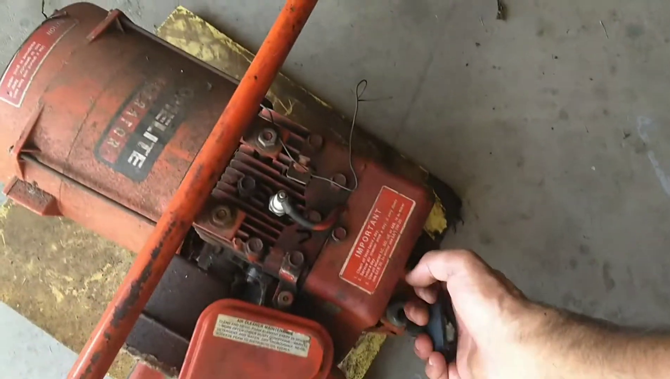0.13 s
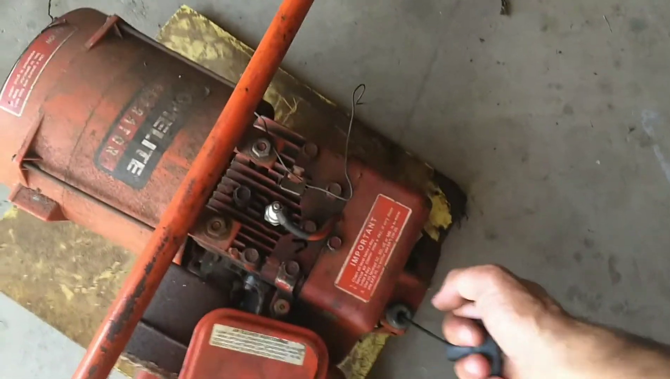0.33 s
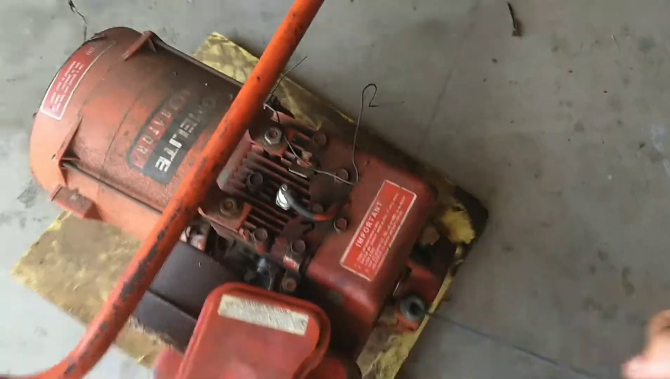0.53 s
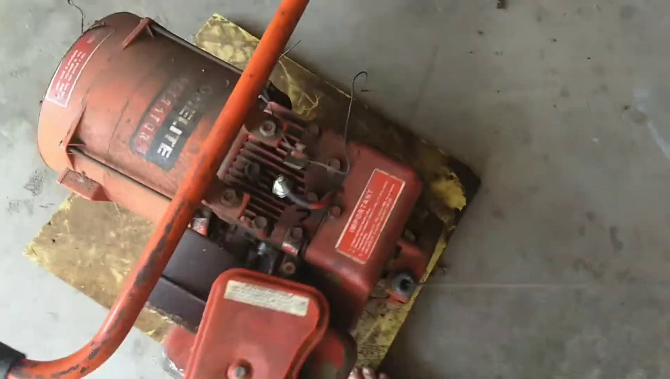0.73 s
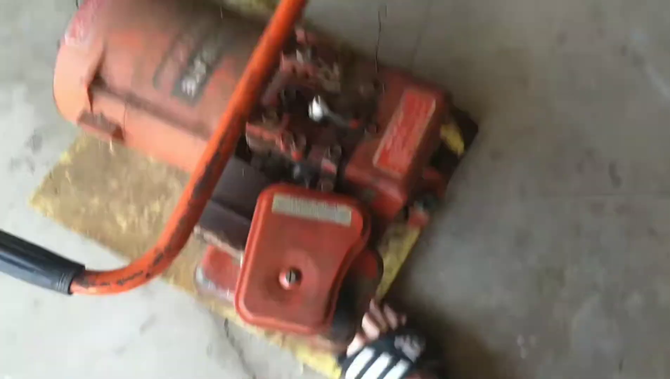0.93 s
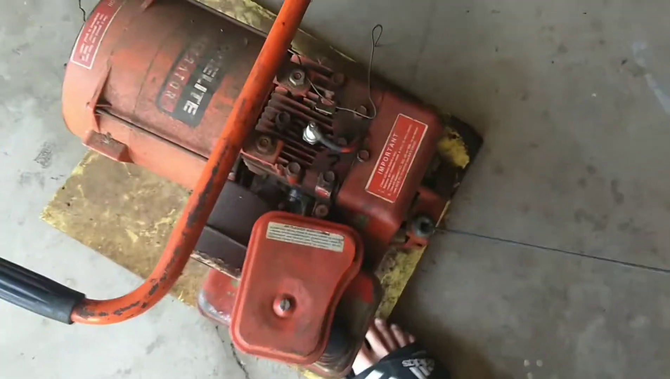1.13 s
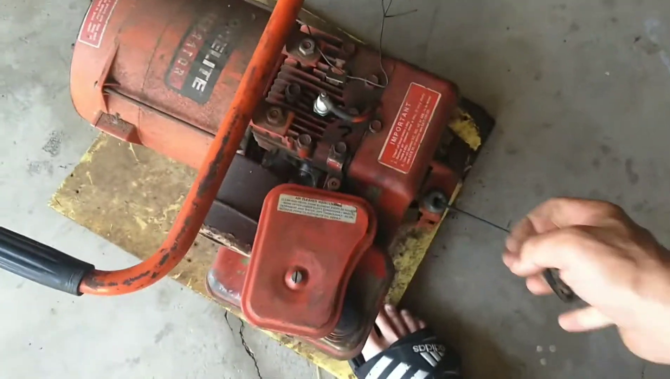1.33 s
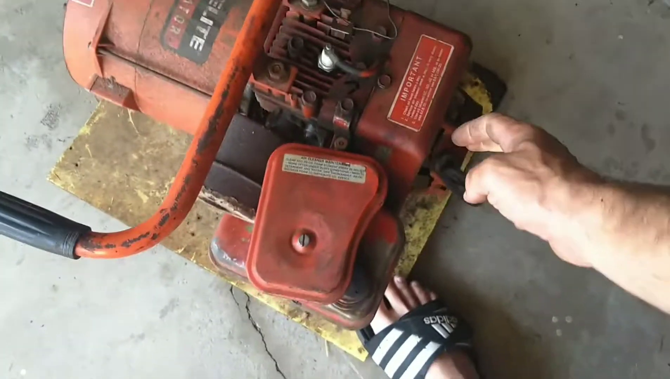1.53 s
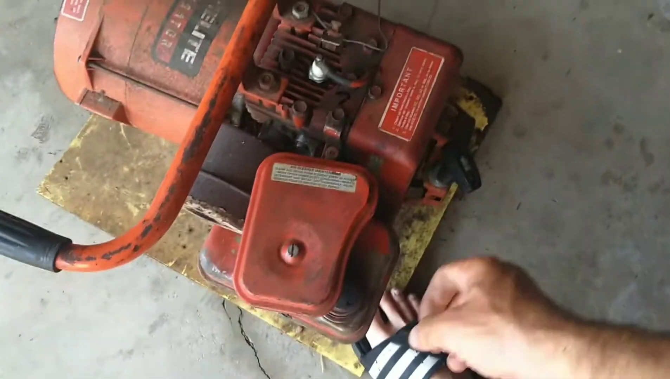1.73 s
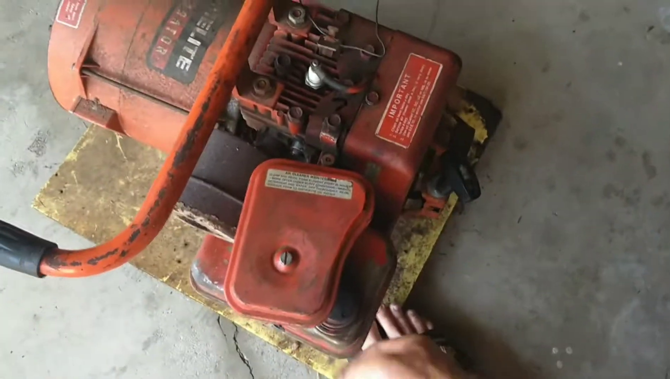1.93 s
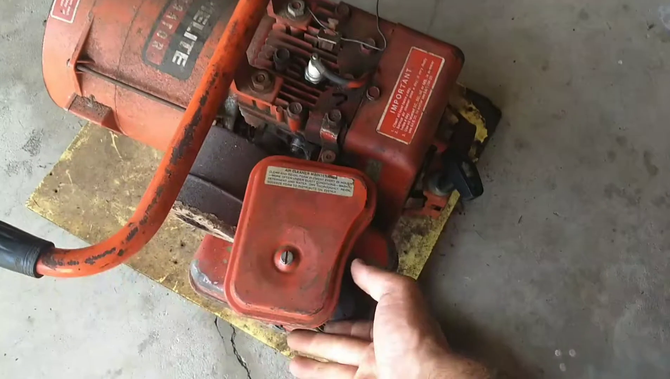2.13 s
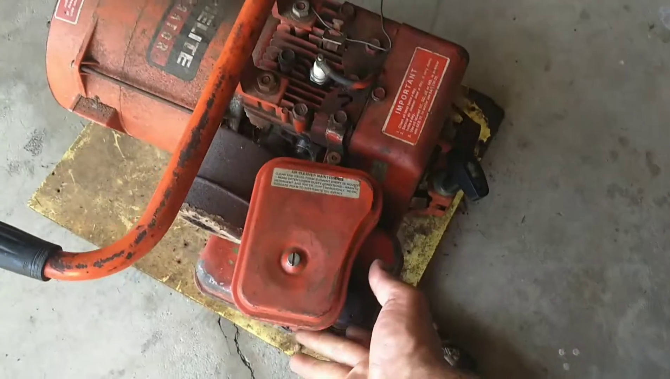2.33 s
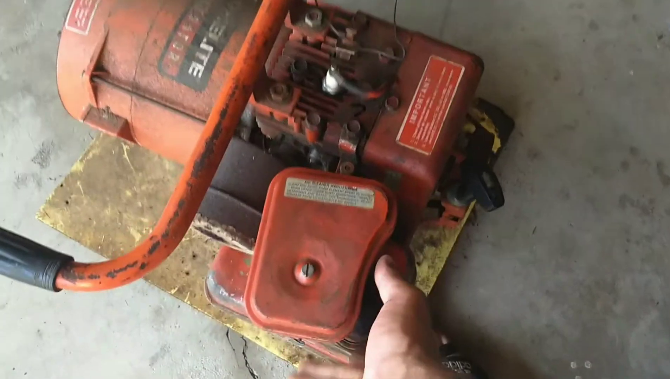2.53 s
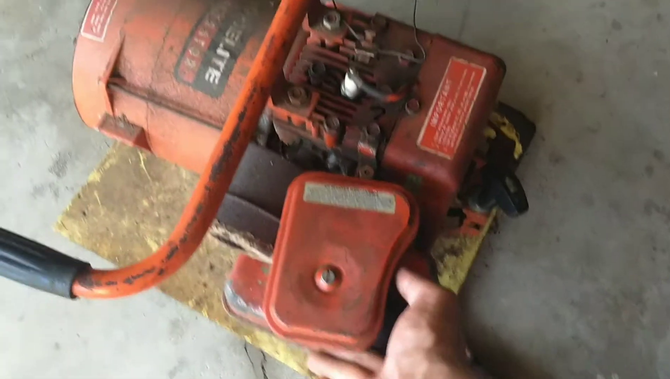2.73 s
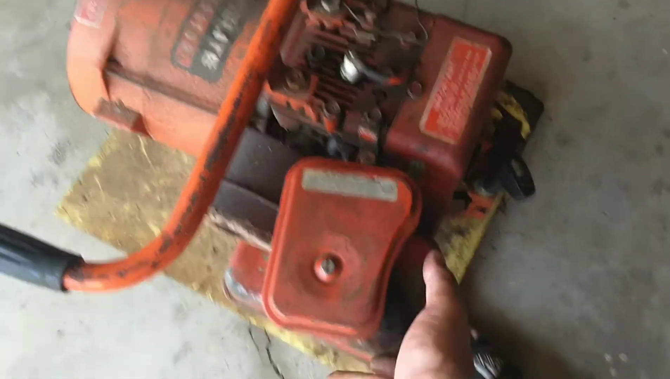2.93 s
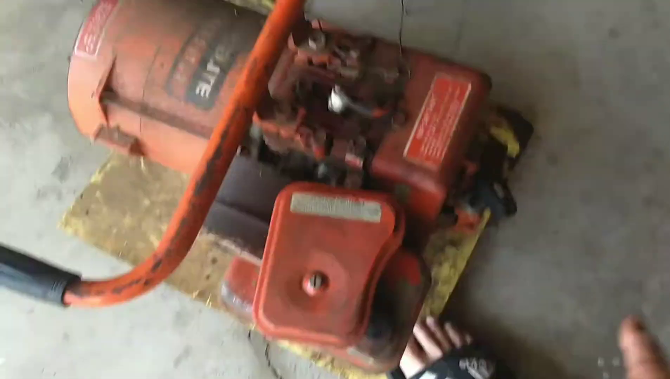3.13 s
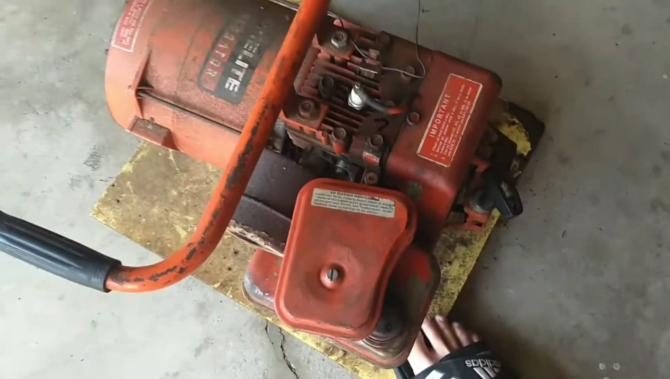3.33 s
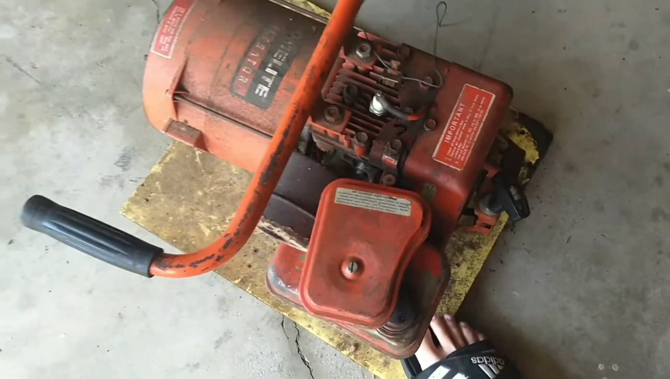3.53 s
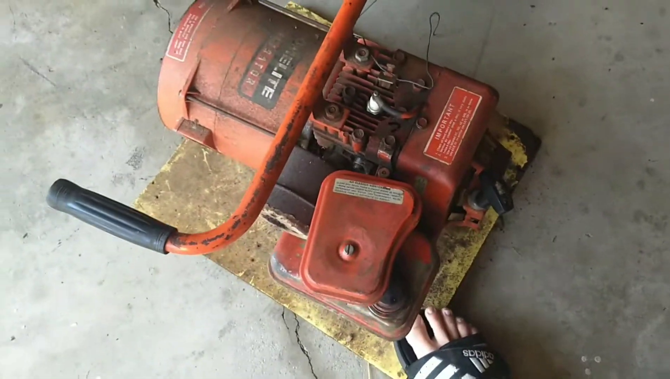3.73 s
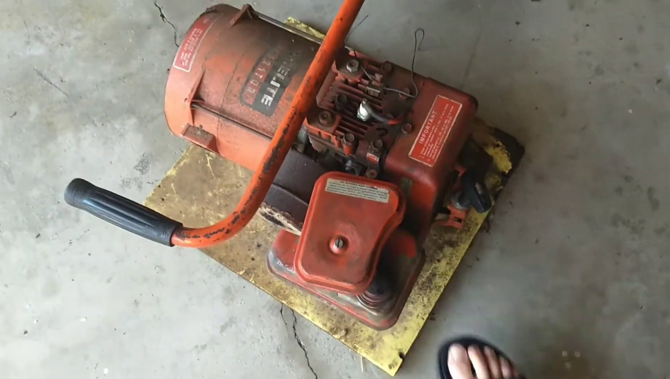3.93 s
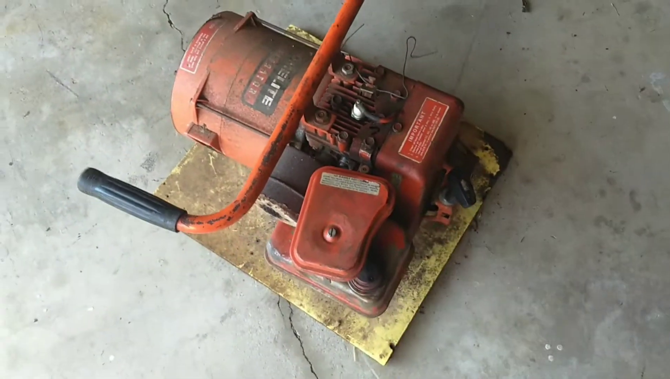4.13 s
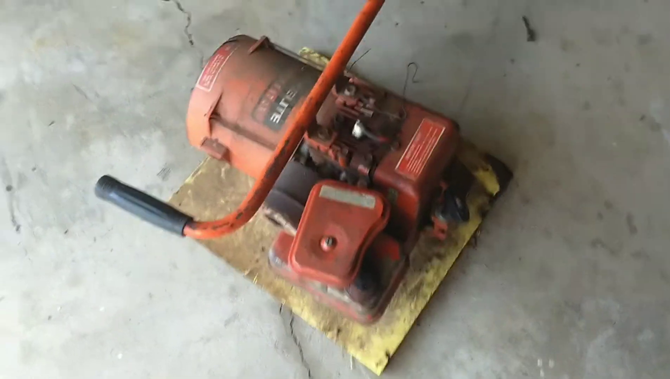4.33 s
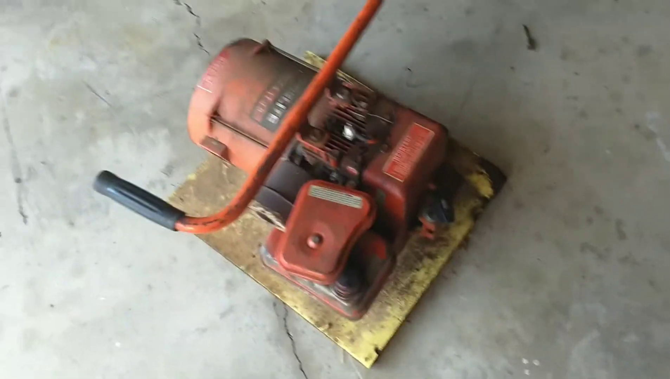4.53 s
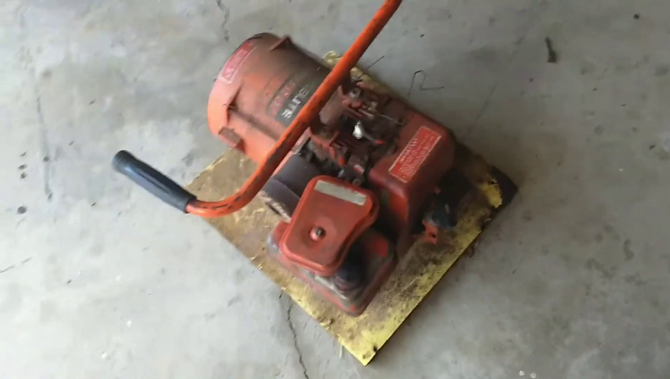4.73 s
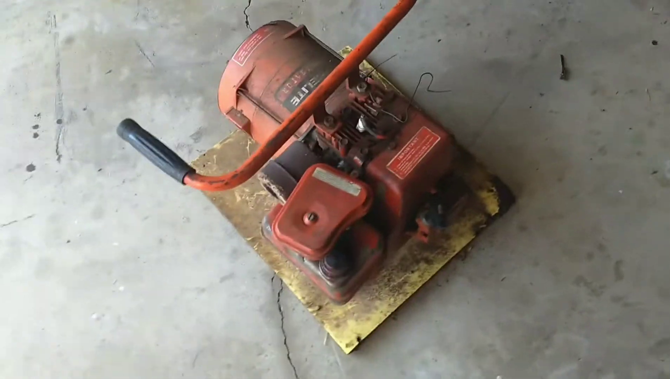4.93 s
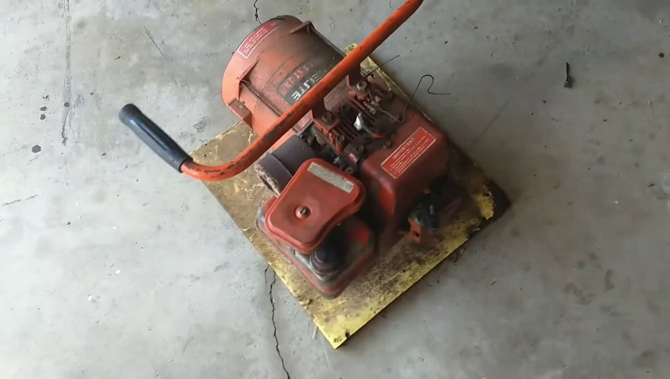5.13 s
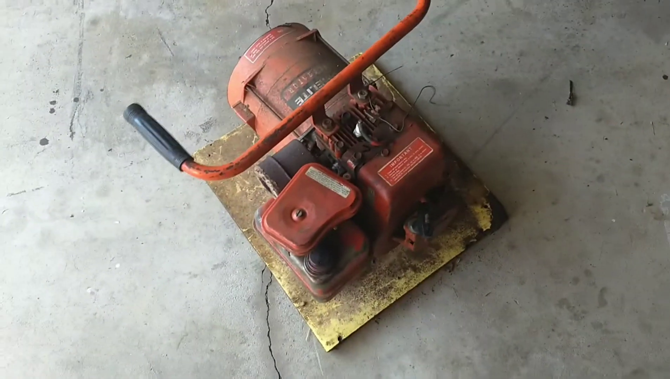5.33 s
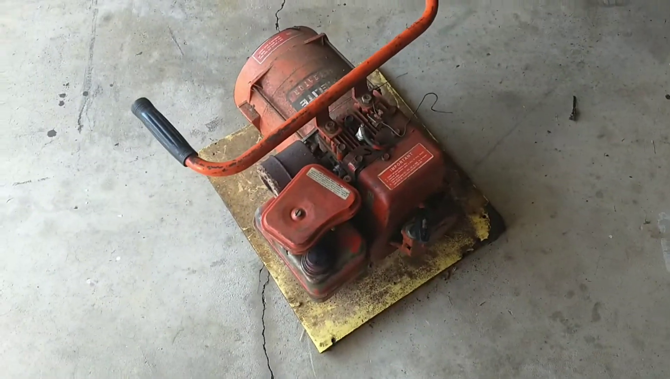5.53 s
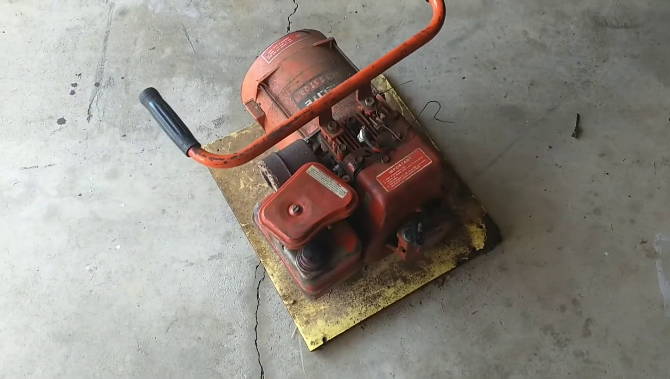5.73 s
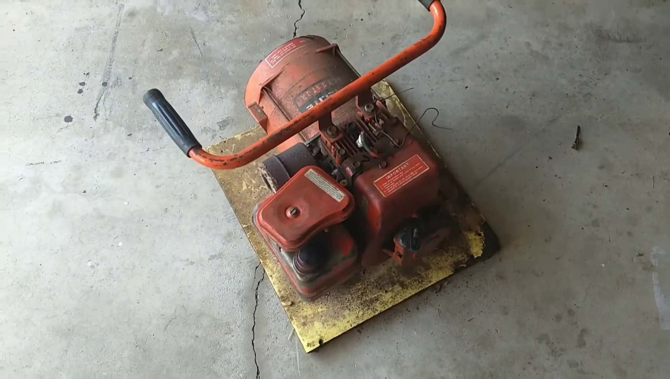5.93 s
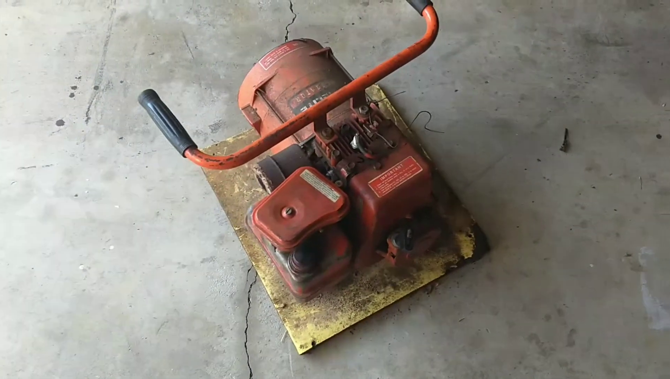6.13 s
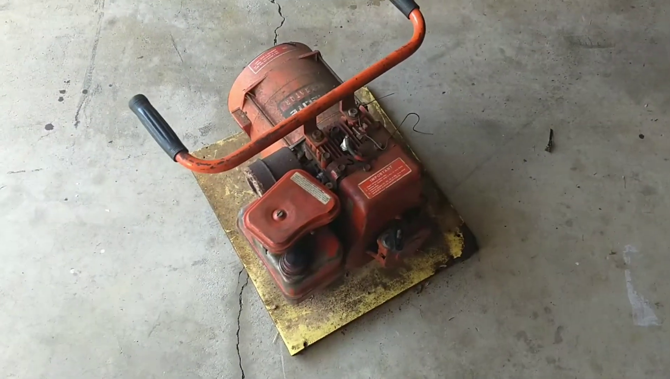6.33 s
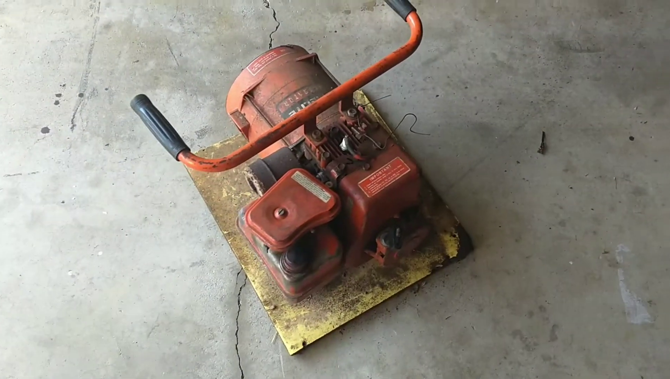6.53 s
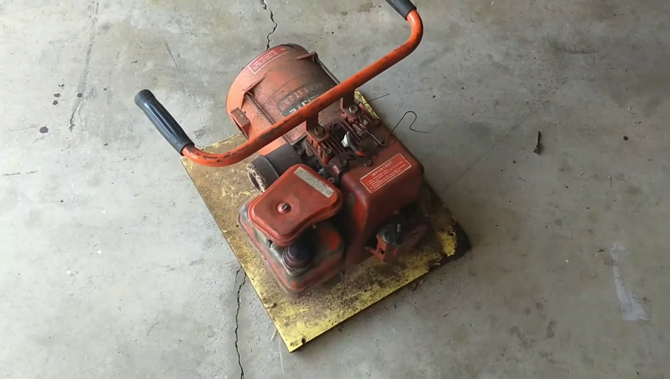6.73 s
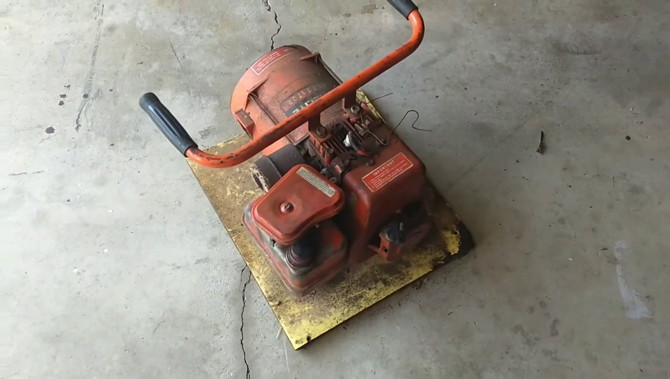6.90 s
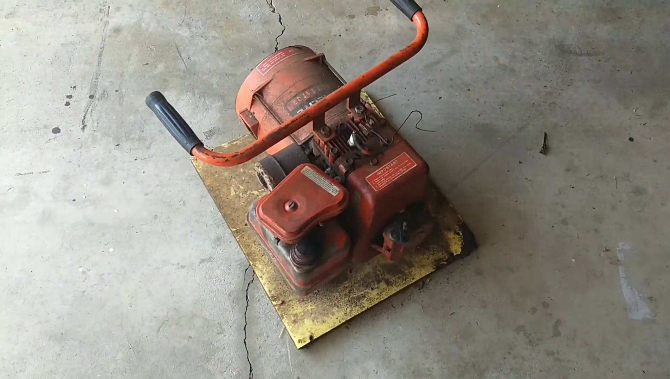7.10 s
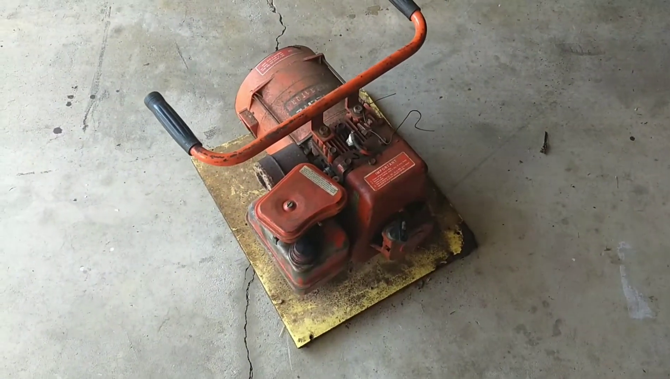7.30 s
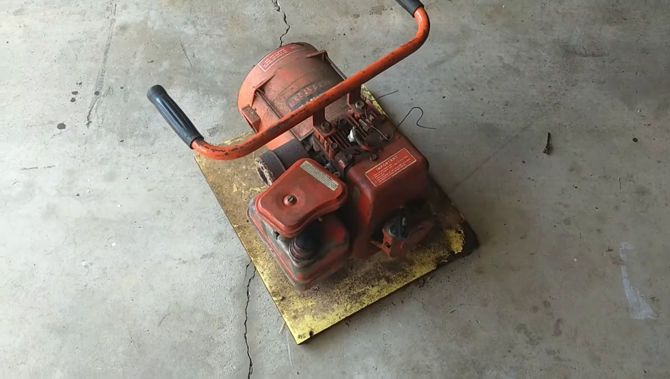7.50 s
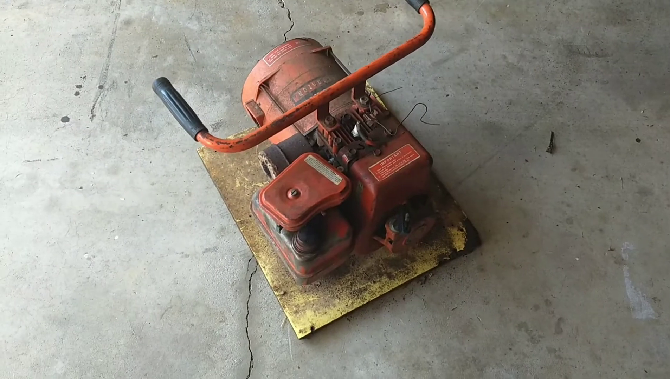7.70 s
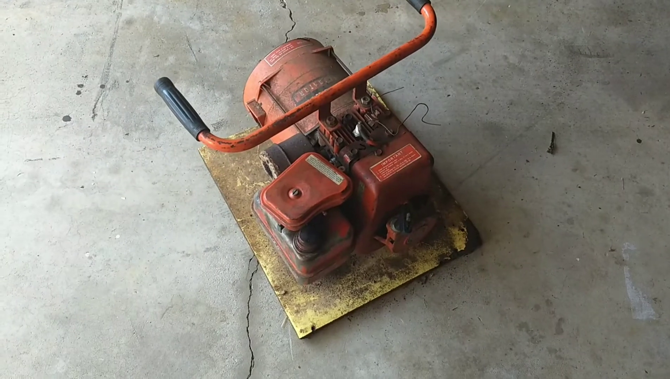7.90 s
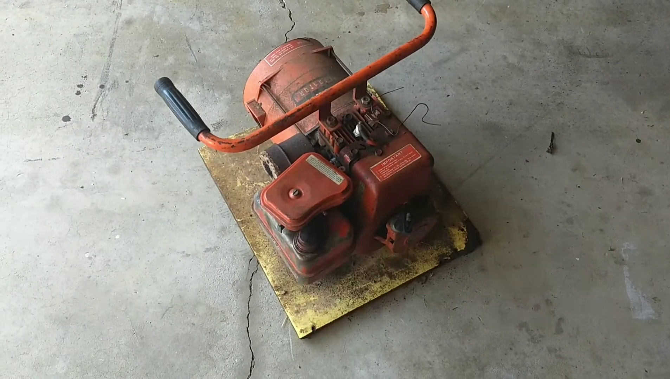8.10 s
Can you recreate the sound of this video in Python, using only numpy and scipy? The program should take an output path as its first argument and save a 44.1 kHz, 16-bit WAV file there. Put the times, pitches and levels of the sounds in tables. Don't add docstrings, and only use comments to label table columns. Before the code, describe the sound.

A rope pull clatters and knocks, then a small one-cylinder engine catches, stumbles unevenly, speeds up and settles into rapid popping in a garage.

```python
import sys
import numpy as np
from scipy import signal
from scipy.fft import rfft, irfft
from scipy.io import wavfile
from scipy.ndimage import uniform_filter1d

SR = 44100
rng = np.random.default_rng(int(sys.argv[2]) if len(sys.argv) > 2 else 0)


def voltage_ratio(decibels):
    exponent = np.asarray(decibels, float) / 20
    return 10 ** exponent


def bounce(signal):
    frames = np.transpose(np.atleast_2d(signal))
    limited = np.clip(frames, -1, 1)
    pcm = np.round(limited * 32767).astype(np.int16)
    wavfile.write(sys.argv[1], SR, pcm)


N = 364266
T = np.arange(N) / SR
RUN_S = 4.5234


def unit(x):
    return x / np.sqrt(np.mean(x ** 2))


def ring(x, hz, width_hz):
    return signal.lfilter(*signal.iirpeak(hz, hz / width_hz, SR), x)


def body(x, modes):
    return sum(voltage_ratio(db) * ring(ring(x, hz, width_hz), hz, width_hz) for hz, width_hz, db in modes)


def colour(x, points):
    hz, db = np.transpose(points)
    log_hz = np.log(np.fft.rfftfreq(N, 1 / SR) + 1)
    gain = voltage_ratio(np.interp(log_hz, np.log(hz), db))
    return unit(irfft(rfft(x) * gain, N))


def noise():
    return rng.standard_normal((2, N))


def grains(shape, db):
    return voltage_ratio(db * np.minimum(rng.exponential(size=shape), 3.5))


def spikes(times_s, sizes):
    at = (np.asarray(times_s) * SR).astype(int)
    inside = at < N
    return np.bincount(at[inside], np.broadcast_to(sizes, at.shape)[inside], N)


def struck(train, shape):
    return signal.fftconvolve(train, shape)[:N]


# start in seconds, thump in dB, crack in dB.
STUMBLE_FIRINGS = [(1.0583, -13, 2), (1.1619, -11.5, 3.5), (1.255, -11.5, 1), (1.3454, -15, -0.5),
                   (1.4333, -17.5, -4.5), (1.618, -16, -4), (2.1334, -15, -2.5), (2.3773, -16.5, -4),
                   (2.6384, -14.5, -5), (2.8977, -16, 1), (3.1205, -14.5, -1.5), (3.2144, -16.5, -22),
                   (3.309, -16.5, -5), (3.4018, -21, -16), (3.581, -19, -2), (3.744, -21.5, -3.5),
                   (3.8987, -22, -6), (4.0442, -18.5, -4.5), (4.2559, -19.5, -5), (4.3891, -20, -7)]
# start in seconds, thump in dB, gas in dB.
MISFIRES = [(1.7142, -21.5, -33), (1.8038, -21.5, -27), (1.9099, -30, -51), (2.0165, -22.5, -26),
            (2.2565, -23.5, -50), (2.506, -24, -50), (2.7668, -23, -50), (3.0077, -23, -50),
            (3.4924, -22.5, -71)]
EXTRA_FIRINGS = [57, 59, 61]
SOFT_CYCLES = [26, 40, 48, 52, 56, 59, 60, 61, 68]


def strokes():
    governed_s, lost_s, settle_cycles = .04981, .1905, 12
    hunt_s, hunt_cycles, hunt_peak_cycle = .0015, 27, 12
    run_thump_db, run_crack_db, soft_db = -20, -9, -32
    thump_growth_db = 0.5
    thump_scatter_db, gas_scatter_db, crack_scatter_db = 1.2, .7, 2.2
    gas_db, gas_follows = -18.5, 0.54
    misfire_crack_db = 6.5

    cycle = np.union1d(np.arange(0, 72, 2), EXTRA_FIRINGS)
    run_s = RUN_S + governed_s * cycle + lost_s * (1 - np.exp(-cycle / settle_cycles))
    run_s = run_s + hunt_s * np.cos(2 * np.pi * (cycle - hunt_peak_cycle) / hunt_cycles)
    chance = rng.standard_normal((3, len(cycle)))
    run_thump = run_thump_db - thump_growth_db * (2 * np.exp(-cycle / settle_cycles / 2) - .5)
    run_thump = run_thump + thump_scatter_db * chance[0]
    run_crack = run_crack_db + crack_scatter_db * chance[1] + soft_db * np.isin(cycle, SOFT_CYCLES)

    s, thump, crack = np.r_[STUMBLE_FIRINGS, np.c_[run_s, run_thump, run_crack]].T
    gas_scatter = np.r_[np.zeros(len(STUMBLE_FIRINGS)), gas_scatter_db * chance[2]]
    gas = gas_db + gas_follows * (thump + 20) + gas_scatter
    weak = [(at, db, weak_gas_db - db, misfire_crack_db) for at, db, weak_gas_db in MISFIRES]
    rows = np.r_[np.c_[s, thump, gas - thump, crack - thump], weak]
    return rows[np.argsort(rows[:, 0])].T


# time in seconds, rough cycle length in seconds.
CYCLE_LENGTH = [(1, .1), (2.4, .125), (3.5, .088), (4.1, .071), (5, .058), (6, .052), (8.3, .05)]


def cam(s):
    length_s = np.interp(s[1:], *np.transpose(CYCLE_LENGTH))
    turns = np.cumsum(np.r_[0, np.round(np.diff(s) / length_s)])
    angle = np.interp(T, np.r_[0, s, s[-1] + 1], np.r_[-6, turns, turns[-1] + 20])
    return angle, turns


# frequency in Hz, level in dB.
GAS_HISS = [(1000, 9.5), (2000, 9), (4000, -1), (7000, 8.5), (10000, 0), (15200, 1), (15900, -20),
            (17000, -40)]


def exhaust(turns, s, thump_db, gas_db, crack_db):
    t = T[:2000]
    heave = []
    for lag_s in (.0002, .0022):
        late = t - lag_s
        heave.append(-np.sin(2 * np.pi * 118 * late) * np.exp(-((late - .0068) / 0.0029) ** 2))
    crack = np.exp(-((t - .0004) / .00017) ** 2) - .5 * np.exp(-((t - .001) / .00025) ** 2)
    crack = crack + 0.033 * np.sin(2 * np.pi * 1350 * t) * np.exp(-((t - .002) / 0.00021) ** 2)
    puff = np.exp(-((t - .0032) / np.where(t < .0032, .002, .0045)) ** 2)
    puff = puff + voltage_ratio(-45.5) * (t > .004) * np.exp(-t / 0.049)

    unfired = np.setdiff1d(np.arange(turns[-1]), turns)
    heaves = spikes(s, voltage_ratio(thump_db - 0.7)) + spikes(np.interp(unfired, turns, s), voltage_ratio(-28.0))
    cracks = struck(spikes(s, voltage_ratio(thump_db + crack_db - 10.5)), crack)
    gas = struck(spikes(s, voltage_ratio(thump_db + gas_db - 3.5)), puff) * colour(noise(), GAS_HISS)
    return np.array([struck(heaves, h) for h in heave]) + cracks + gas


# share of the cycle 0-1, level in dB, pitch in Hz, treble in dB.
CAM_TICKS = [(.32, 0, 800, -13), (.39, -8, 1300, -15), (.6, -7, 330, -24), (.68, -5, 500, -24),
             (.88, -8, 600, -20), (.97, -10, 1850, -22)]
# frequency in Hz, level in dB.
WHIRR_SPECTRUM = [(1500, -5), (2300, 9), (3100, 1), (4700, 9.5), (5500, 1), (8000, -1), (10000, -5.5),
                  (13000, -10), (15300, -12), (16000, -50)]


def valves(turns, s, casing_db):
    tick_db, treble_lost_db = 21, 3
    cycles, t, out = np.arange(turns[-1] + 1), T[:1500], 0
    hiss = colour(noise(), WHIRR_SPECTRUM) * voltage_ratio(2.0 - treble_lost_db * np.clip(T - RUN_S, 0, 1))
    casing_ring = .14 * np.sin(2 * np.pi * 1880 * t) * np.exp(-t / .006)
    for share, db, hz, treble_db in CAM_TICKS:
        late, louder = rng.standard_normal((2, len(cycles))).clip(-2, 1.4)
        at_s = np.interp(cycles + share, turns, s, right=9) + 0.00039 * late
        train = spikes(at_s, voltage_ratio(db + 3.53 * louder))
        click = np.sin(2 * np.pi * hz * t) * np.exp(-(t * hz / 0.33) ** 2) + casing_ring
        out = out + struck(train, click)
        out = out + struck(train, np.exp(-t / 0.0069)) * hiss * voltage_ratio(treble_db)
    return out * voltage_ratio(uniform_filter1d(casing_db, SR // 2) + tick_db)


# time in seconds, level in dB.
SHAKE_LEVEL = [(0.0, -64), (0.3, -67), (0.37, -46), (0.53, -38), (0.85, -40), (0.94, -31), (1.13, -30.5),
               (1.4, -40.5), (2.02, -34.5), (2.39, -42), (3.11, -36.5), (3.4, -39), (4.62, -40),
               (4.74, -34), (4.95, -42.5), (5.24, -36.5), (5.93, -36), (8.26, -35.5)]
# time in seconds, whirr over shake in dB.
ROPE_WHIRR = [
    (0, -12),
    (.34, -3),
    (.46, 15.5),
    (.55, 12),
    (.64, -7),
    (.9, 1.5),
    (1.13, 7.5),
    (1.3, -1),
]


def shaken():
    shake = np.interp(T, *np.transpose(SHAKE_LEVEL))
    shroud = -0.5 - 32 * np.clip((T - 4.22) / 1.5, 0, 1)
    frame = np.interp(T, [1.1, 1.4, 5.15], [-3, -10, 1])
    whirr = 7 + np.interp(T, *np.transpose(ROPE_WHIRR))
    return shake, shake + shroud, shake + frame, shake + whirr


# frequency in Hz, width in Hz, level in dB.
CASING_MODES = [(899, 254, 2.5), (1163, 160, 0), (1497, 52, 2.5), (1670, 132, 5.5), (1954, 130, 4.5),
                (2300, 1200, 5.5)]
# frequency in Hz, width in Hz, level in dB.
SHROUD_MODES = [(632.7, 86, 16), (723, 65, 12)]
# frequency in Hz, width in Hz, level in dB.
FRAME_MODES = [(121, 52, 3), (215, 42, -6.5), (403.7, 118, 6), (520, 260, 6)]


def rattle(angle, turns, casing_db, shroud_db, frame_db, whirr_db):
    since_cycles = (angle - turns[np.searchsorted(turns, angle).clip(1) - 1]) % 3
    cycle = rng.standard_normal((2, 2048)) * grains(64, 5.66).repeat(32)
    pattern = np.tile(cycle, 3) * (1 + .5 * rng.standard_normal(192).repeat(32))
    pattern = pattern + .5 * rng.standard_normal((2, 3 * 2048))
    pattern = unit(pattern[:, (since_cycles * 2048).astype(int)])
    loose = grains((2, N // 40 + 1), 0.46).repeat(40, axis=1)[:, :N]
    stray = unit(noise() * loose)
    throb = voltage_ratio(2.2 * np.cos(2 * np.pi * (angle - .25)))

    out = voltage_ratio(whirr_db - 13) * throb * colour(noise() * loose ** 0.19, WHIRR_SPECTRUM)
    thin_db = casing_db + 0.36 * (shroud_db - casing_db)
    parts = [(CASING_MODES[:4], casing_db + 1, -6), (CASING_MODES[4:], thin_db - 7, -3),
             (SHROUD_MODES, shroud_db + .4, -3), (FRAME_MODES, frame_db + 1.5, -11)]
    for modes, db, stray_db in parts:
        clatter = (pattern + voltage_ratio(stray_db) * stray) * throb ** 1.23
        out = out + voltage_ratio(db) * unit(body(clatter, modes))
    return out


# multiple of the cycle rate, level in dB.
HUM_ORDERS = [(6, -14), (10, -10), (19, -6), (20, -8), (21, -2), (24, -7), (28, -3), (31, -9), (47, -9),
              (56, -9)]


def hum(angle, frame_db):
    hum_db, waver_db, held = -2.5, 5, int(.04 * SR)
    speed = uniform_filter1d(np.gradient(angle), SR // 10)
    turned = np.cumsum(speed)
    drone = 0
    for order, db in HUM_ORDERS:
        steps = rng.standard_normal(N // held + 1).repeat(held)[:N]
        waver = waver_db * (uniform_filter1d(steps, held) - .5)
        drone = drone + voltage_ratio(db + waver) * np.sin(2 * np.pi * (order * turned + rng.random()))
    return drone * voltage_ratio(frame_db + hum_db) * np.clip(speed * SR / 19, 0, 1) ** 3


def knocks(rows, treble_db, rough):
    out, t = np.zeros((2, N)), T[:12000]
    for s, db, hz, t60_s in rows:
        fade = np.exp(-np.log(1000) * t / np.clip(t60_s, .01, .5))
        grit = rng.standard_normal((2, 2, len(t)))
        tail = unit(ring(grit[0], hz, 1.3 * hz)) * 0.99 * rough
        spit = unit(ring(grit[1], 6500.0, 2700.0)) * voltage_ratio(treble_db) * 0.45
        tone = (1 - rough) * np.sin(2 * np.pi * hz * t)
        at = int(s * SR)
        out[:, at:at + len(t)] += voltage_ratio(db) * fade * (tail + spit - tone)
    return out


# start in seconds, peak in dB, pitch in Hz, t60 in seconds.
LEVER_CLICKS = [(.285, -34, 5160, 0.044), (.299, -41, 5060, 0.35), (.342, -29.5, 2400, .067),
                (.498, -27, 246, 0.093), (.549, -21.5, 2680, 0.2), (.6077, -13, 3500, 0.02),
                (.695, -31, 7800, 0.095), (.93, -19, 123, 0.11), (1.031, -17, 1687, 0.16),
                (1.189, -23, 688, 0.18), (2.287, -25.5, 1500, 0.044), (2.8171, -12.5, 1230, 0.031),
                (5.8445, -18, 800, 0.019)]


def clicks():
    return knocks(LEVER_CLICKS, treble_db=0, rough=.6)


# start in seconds, peak in dB, pitch in Hz, t60 in seconds.
DULL_BLOWS = [(.214, -42, 2940, .033), (.451, -14.5, 1920, 0.057), (.53, -24, 148, .08),
              (.529, -13.5, 1950, 0.046), (.61, -15.5, 850, 0.058), (.6209, -14, 2300, 0.022),
              (.6272, -5.5, 800, 0.027), (.6486, 0, 483, 0.022), (.669, -29, 497, 0.041),
              (.738, -13.5, 150, 0.034), (.761, -1.5, 770, .0066), (.79, -8, 673, 0.064),
              (.829, -15.5, 112, 0.15), (1.078, -18, 1360, 0.035), (1.638, -8.5, 657, 0.066),
              (1.639, -18, 1420, 0.074), (1.641, -21, 2750, 0.059), (1.664, -18, 632, 0.18),
              (4.8983, -8, 1000, .008)]


def blows():
    return knocks(DULL_BLOWS, treble_db=-53, rough=.35)


# start in seconds, peak in dB, pitch in Hz, t60 in seconds.
TIN_JANGLES = [(0, -37.5, 967, 0.24), (.328, -29, 2980, 0.029), (.411, -28, 3970, .024),
               (.9, -28, 1500, 0.14), (.969, -18, 2410, 0.045), (1.285, -31, 4360, 0.046),
               (2.543, -20.5, 1670, 0.02), (2.805, -17, 1710, .07), (2.972, -21.5, 1490, 0.031),
               (3.044, -21, 1680, 0.038)]


def jangles():
    return knocks(TIN_JANGLES, treble_db=-54, rough=0.58)


# time in seconds, pitch in Hz, level in dB.
BOARD_GROAN = [
    (0.79, 220, -15),
    (0.84, 209, -24),
    (0.862, 222, -44),
    (0.93, 247, -21),
    (0.996, 241, -25),
    (1.038, 234, -31),
    (1.06, 215, -29),
]


def groan():
    s, hz, db = np.transpose(BOARD_GROAN)
    phase = 2 * np.pi * np.cumsum(np.interp(T, s, hz)) / SR
    swell_db = np.interp(T, np.r_[s[0] - .01, s, s[-1] + .02], np.r_[-90, db, -90]) - 2
    return voltage_ratio(swell_db) * (np.sin(phase) + 0.34 * np.sin(phase * 0.65))


# start in seconds, level in dB.
PORT_PUFFS = [(4.718, -26), (4.897, -22), (7, -25), (7.601, -28)]


def puffs():
    s, db = np.transpose(PORT_PUFFS)
    t = T[:1500]
    bump = np.sin(2 * np.pi * 130 * t) * np.exp(-((t - .006) / 0.0028) ** 2)
    return struck(spikes(s, voltage_ratio(db)), bump) * np.array([[1], [0]])


# frequency in Hz, level in dB.
AIR_SPECTRUM = [(25, -10), (87, 4), (280, -3.5), (1000, -6), (3000, -18.5), (8000, -18.5), (15000, -26)]


def air():
    return voltage_ratio(-52) * colour(noise(), AIR_SPECTRUM)


def garage(x, t60_s=0.56, wet_db=-8.0):
    t = T[:SR // 2]
    tail = rng.standard_normal((2, len(t))) * np.exp(-np.log(1000) * t / t60_s) * (t > .006)
    tail = ring(tail, 1600.0, 6200.0)
    tail = tail / np.sqrt(np.sum(tail[0] ** 2))
    return x + voltage_ratio(wet_db) * signal.fftconvolve(x, tail, axes=1)[:, :N]


def scene():
    levels = shaken()
    casing_db, _, frame_db, _ = levels
    fired_s, *strength = strokes()
    angle, turns = cam(fired_s)
    roomy = exhaust(turns, fired_s, *strength) + valves(turns, fired_s, casing_db)
    roomy = roomy + clicks() + blows() + jangles() + groan()
    return garage(roomy) + rattle(angle, turns, *levels) + hum(angle, frame_db) + puffs() + air()


def roll_off(x):
    return signal.sosfilt(signal.butter(12, 16810, fs=SR, output="sos"), x)


# frequency in Hz, level in dB, share 0-1 unrelated to the front port.
BACK_PORT = [(60, 0, 0.06), (150, 0.95, 0.12), (445, -6.5, 0.13), (800, 1.5, 0.64), (1500, 4, 0.5),
             (2020, -10.5, 1), (3500, -4, 1), (15000, -12.5, 0.92)]


def record(dry, back_late_s=0.00014, boost_hz=1500., boost_width_hz=260.0):
    port_lag, cancel = 19, .995
    front, other = rfft(dry)
    hz = np.fft.rfftfreq(N, 1 / SR)
    at_hz, db, share = np.transpose(BACK_PORT)
    db = np.interp(np.log(hz + 1), np.log(at_hz), db)
    share = np.interp(np.log(hz + 1), np.log(at_hz), np.clip(share, 0, 1))
    related = np.sqrt(1 - share ** 2) * front * np.exp(-2j * np.pi * hz * back_late_s)
    back = voltage_ratio(db) * (related + share * other)

    late = cancel * np.exp(-2j * np.pi * hz * port_lag / SR)
    low = 1 / (1 + np.exp(np.clip((hz - boost_hz) / boost_width_hz, -50, 50)))
    lift = 1 / (1 - 0.844 * np.exp(-2j * np.pi * np.minimum(hz * port_lag / SR, .5)))
    sides = np.array([front - late * back, back - late * front]) * (1 - low + low * lift)
    highpass = signal.butter(2, 62, "high", fs=SR, output="sos")
    lowpass = signal.ellip(8, .2, 60, 16500, fs=SR, output="sos")
    wired = signal.sosfilt(highpass, irfft(sides, N))
    wired = signal.sosfilt(lowpass, np.clip(wired, -1, 1))
    return roll_off(wired)


dry = scene()
out = record(dry)
bounce(out)
```